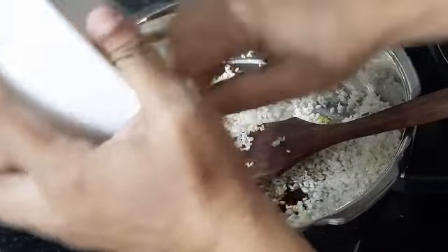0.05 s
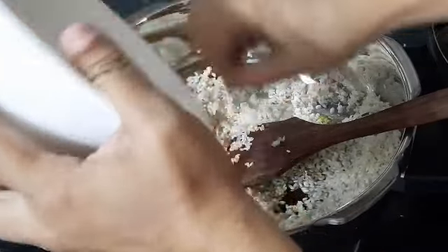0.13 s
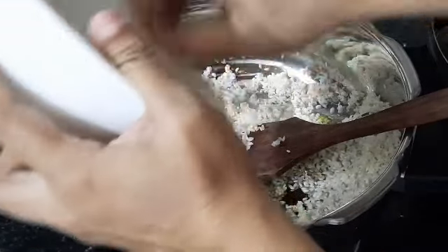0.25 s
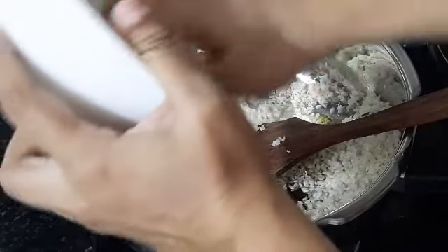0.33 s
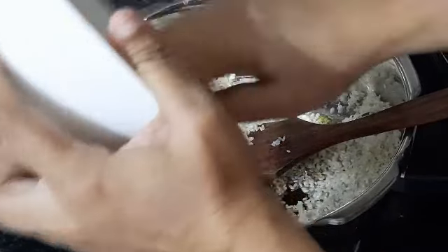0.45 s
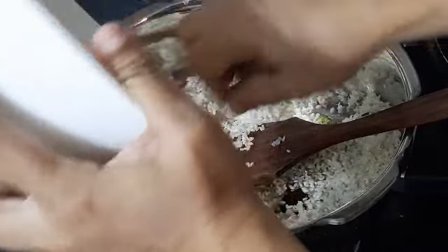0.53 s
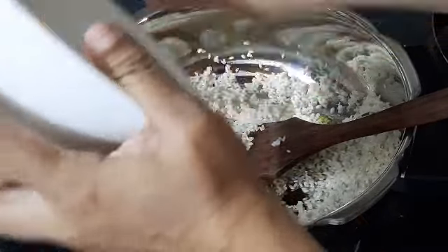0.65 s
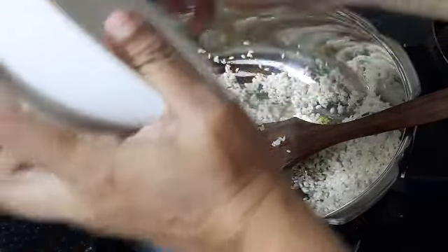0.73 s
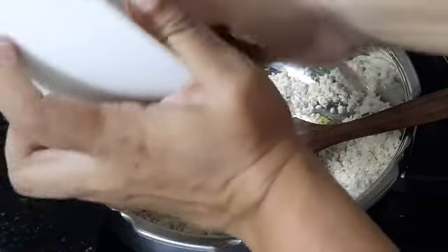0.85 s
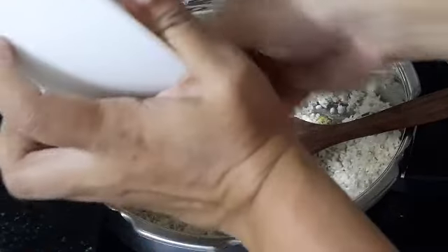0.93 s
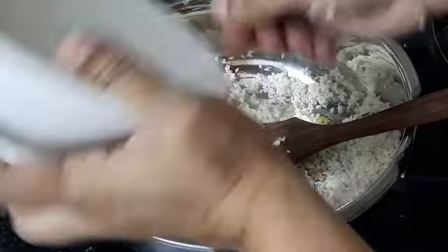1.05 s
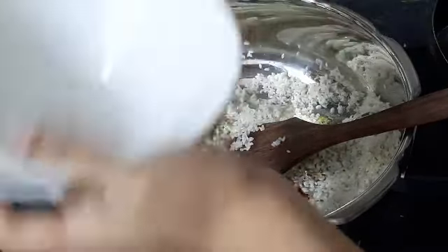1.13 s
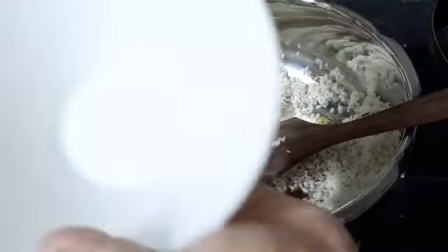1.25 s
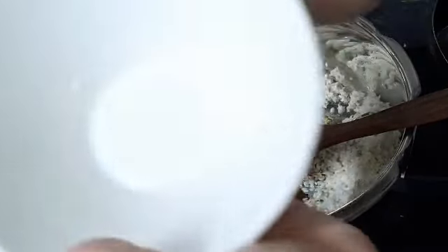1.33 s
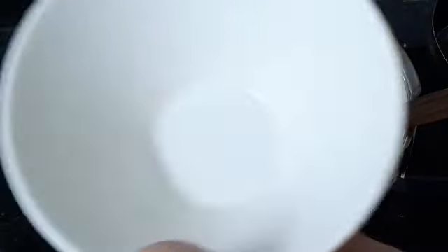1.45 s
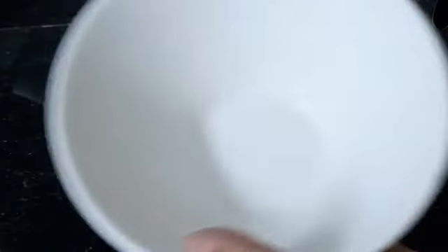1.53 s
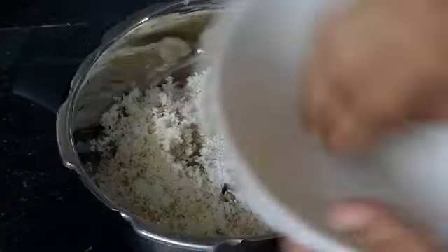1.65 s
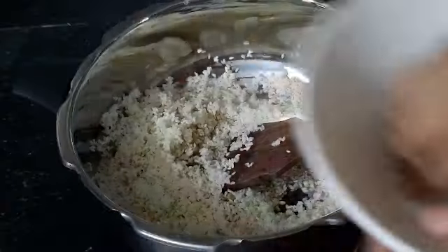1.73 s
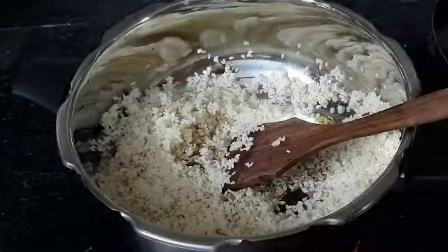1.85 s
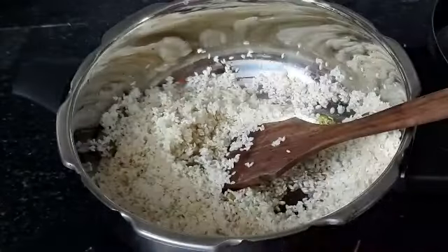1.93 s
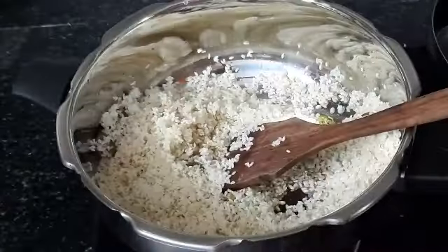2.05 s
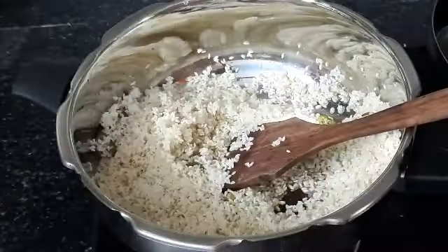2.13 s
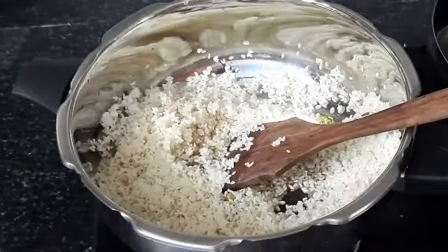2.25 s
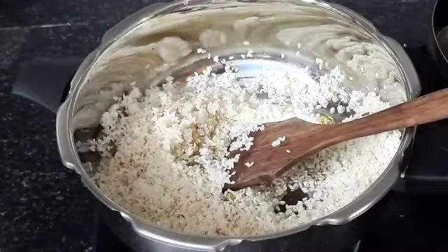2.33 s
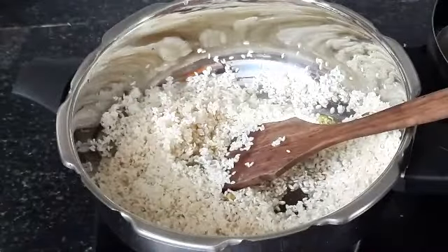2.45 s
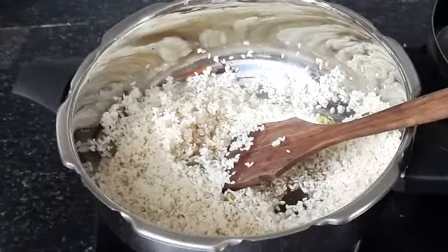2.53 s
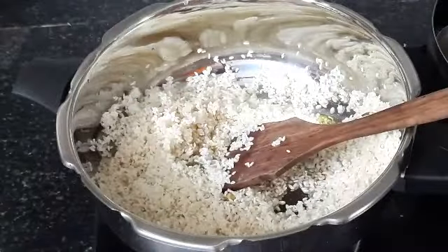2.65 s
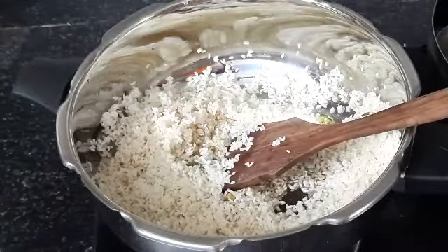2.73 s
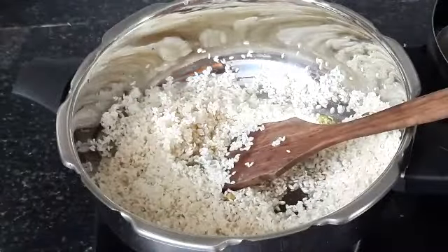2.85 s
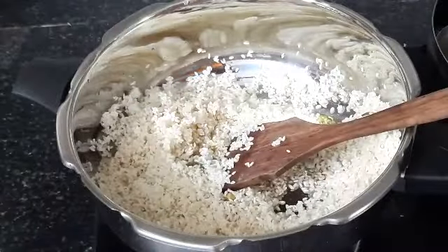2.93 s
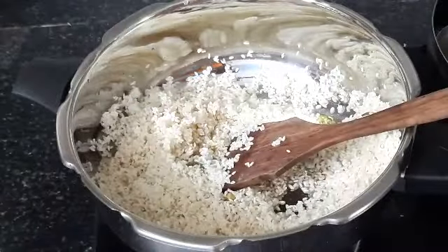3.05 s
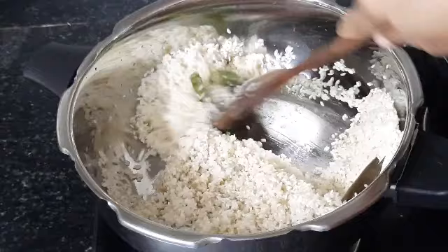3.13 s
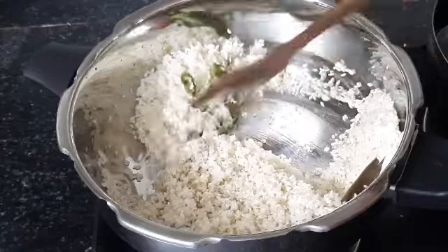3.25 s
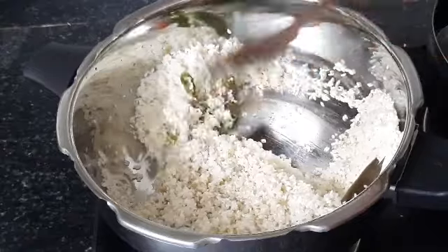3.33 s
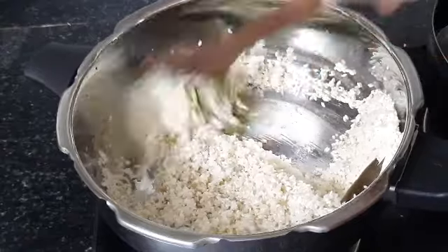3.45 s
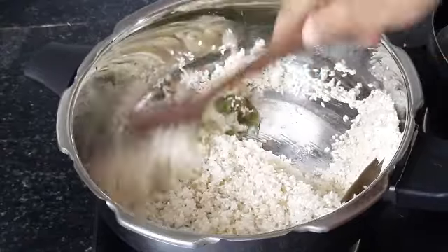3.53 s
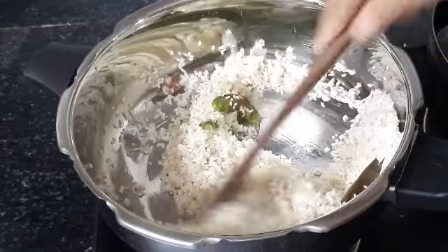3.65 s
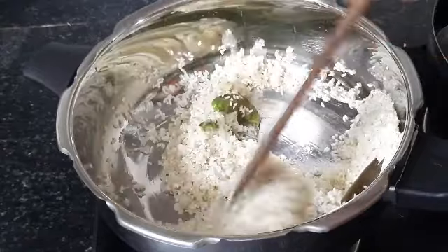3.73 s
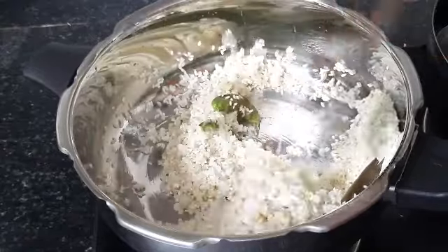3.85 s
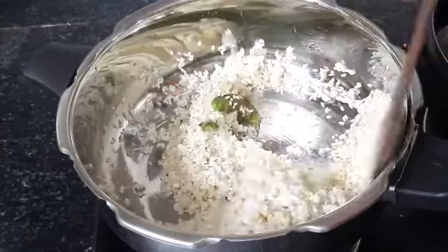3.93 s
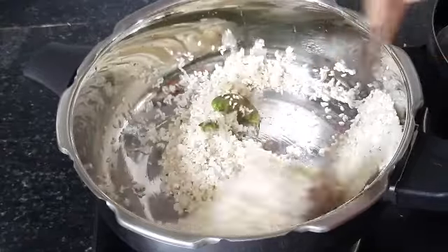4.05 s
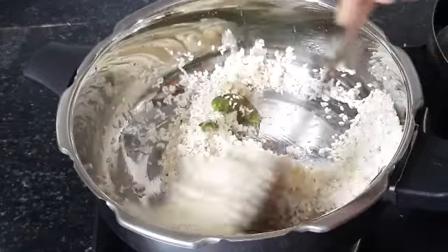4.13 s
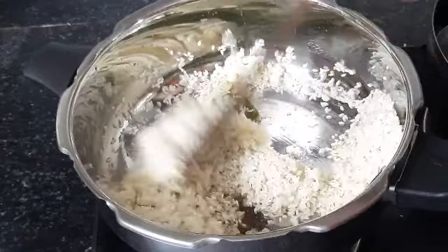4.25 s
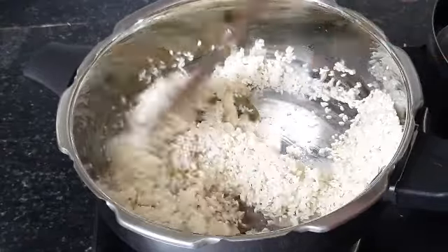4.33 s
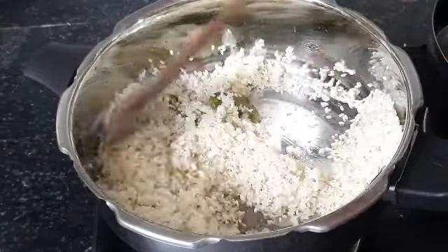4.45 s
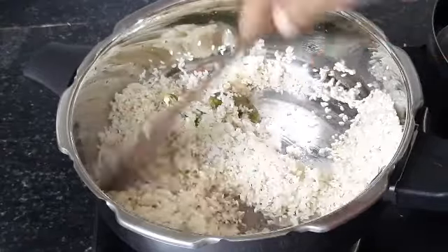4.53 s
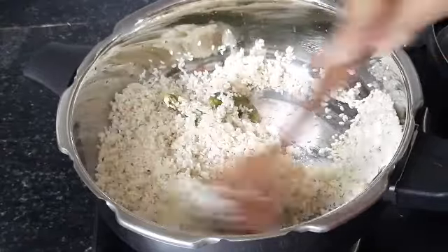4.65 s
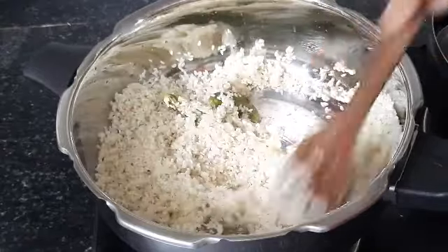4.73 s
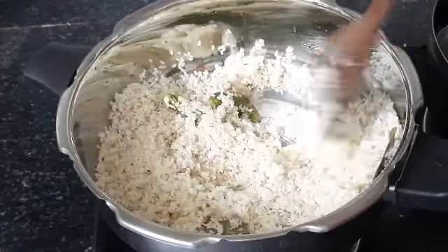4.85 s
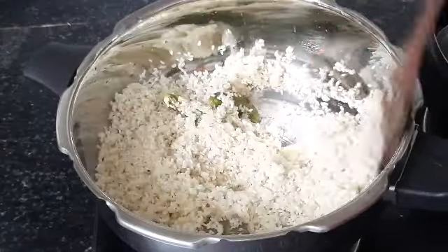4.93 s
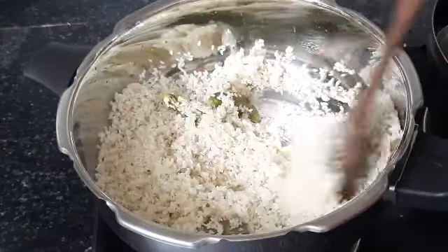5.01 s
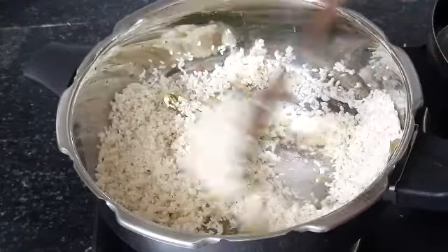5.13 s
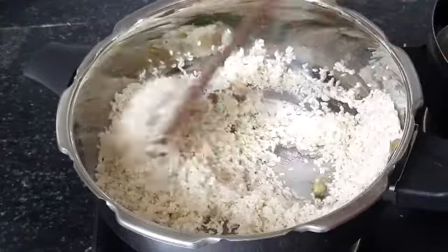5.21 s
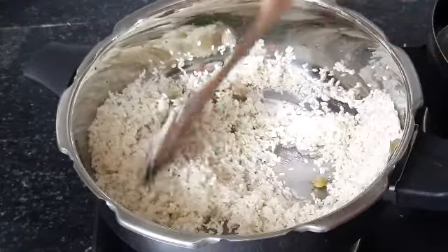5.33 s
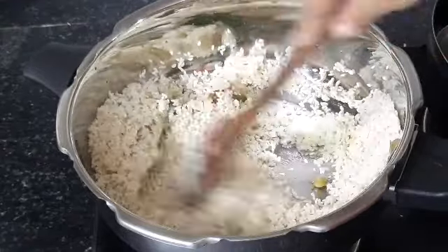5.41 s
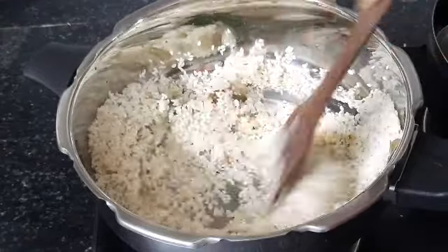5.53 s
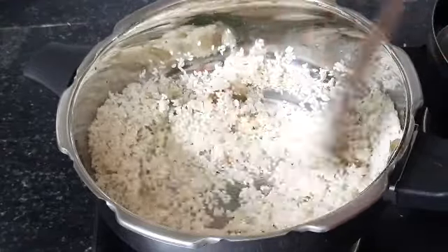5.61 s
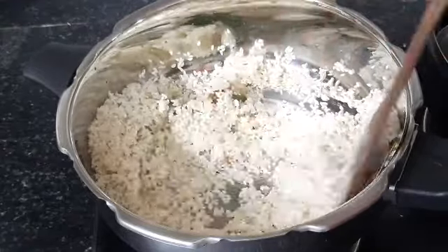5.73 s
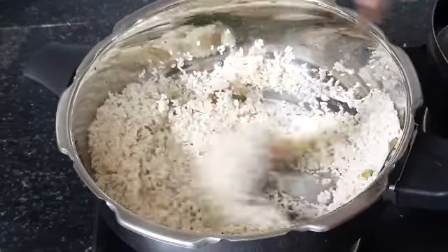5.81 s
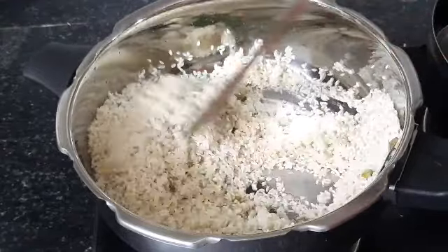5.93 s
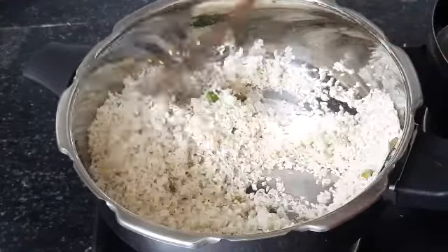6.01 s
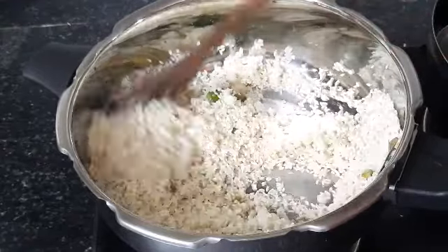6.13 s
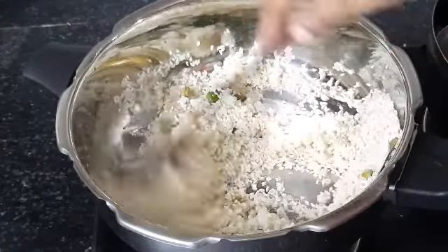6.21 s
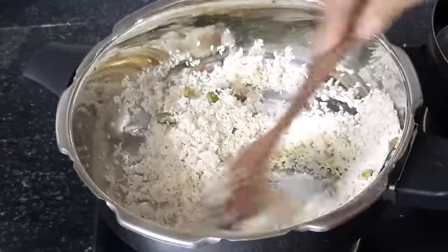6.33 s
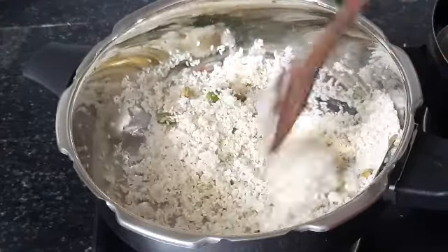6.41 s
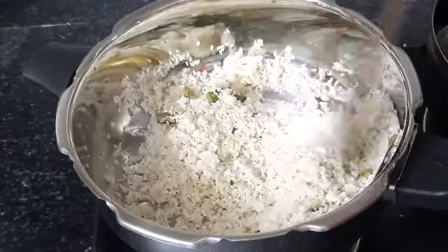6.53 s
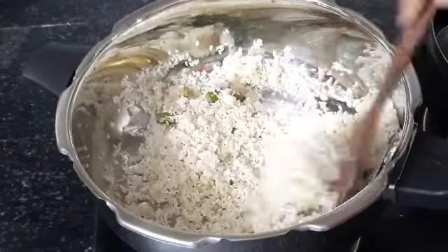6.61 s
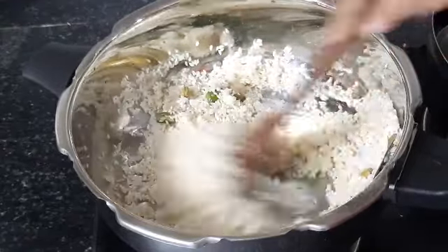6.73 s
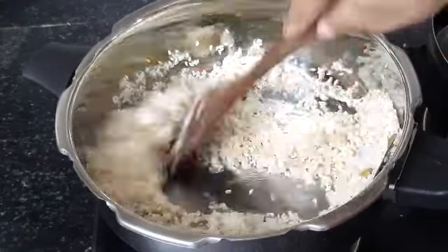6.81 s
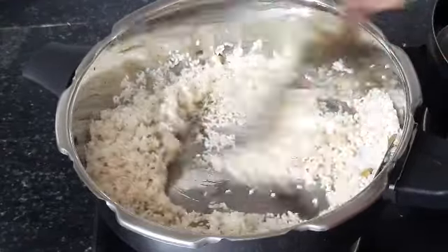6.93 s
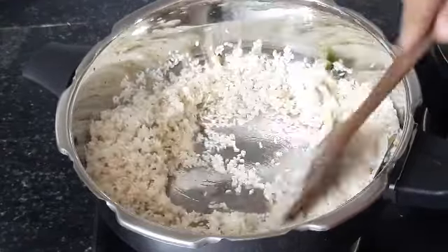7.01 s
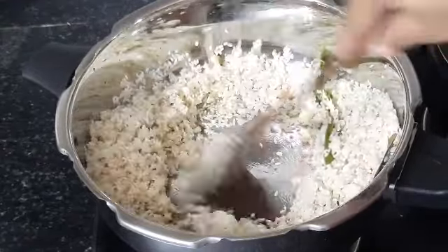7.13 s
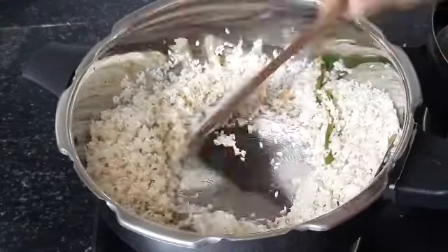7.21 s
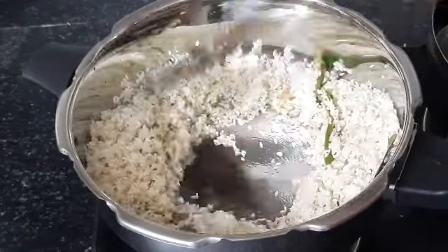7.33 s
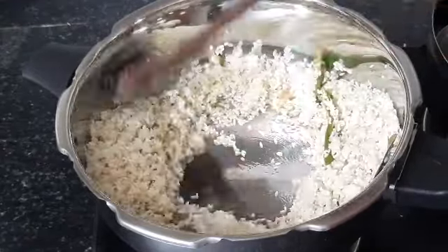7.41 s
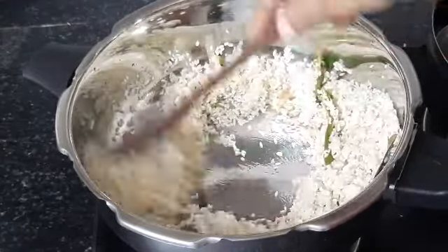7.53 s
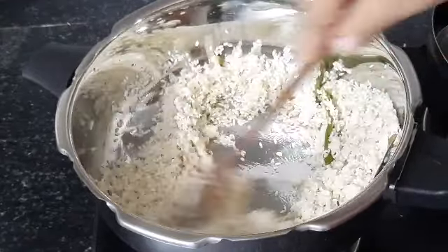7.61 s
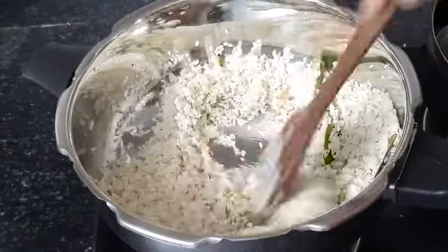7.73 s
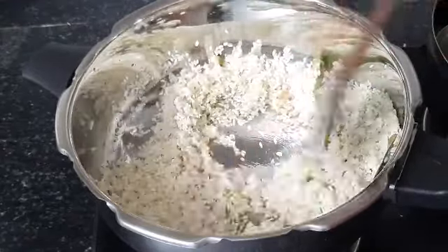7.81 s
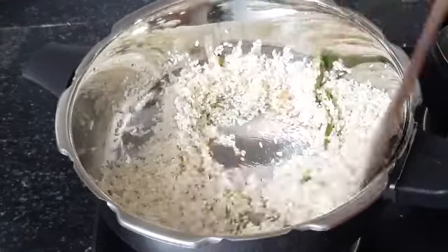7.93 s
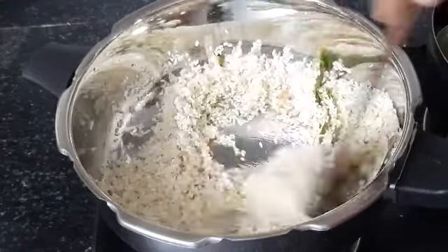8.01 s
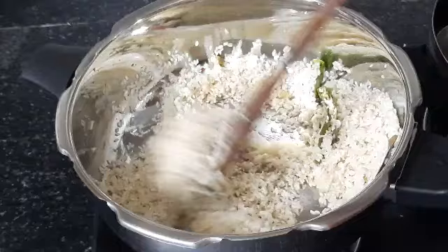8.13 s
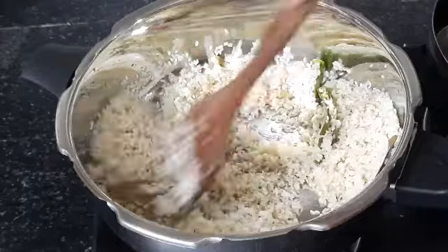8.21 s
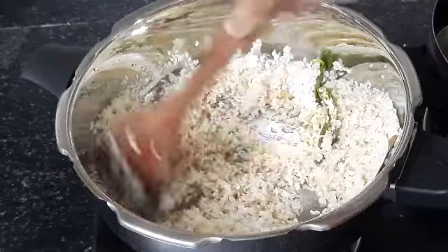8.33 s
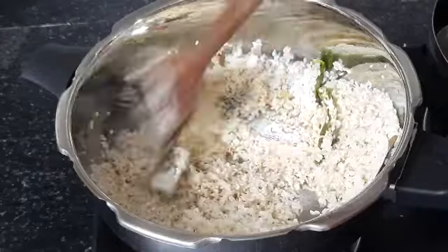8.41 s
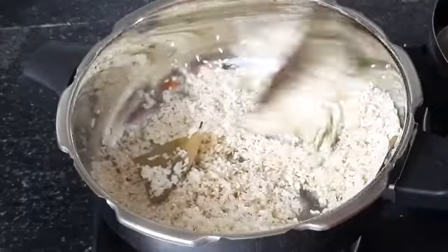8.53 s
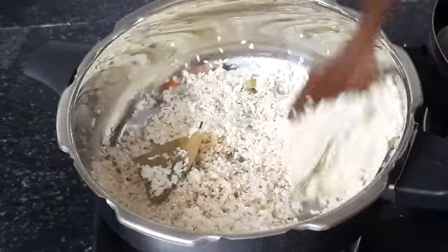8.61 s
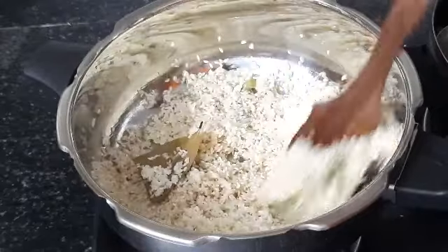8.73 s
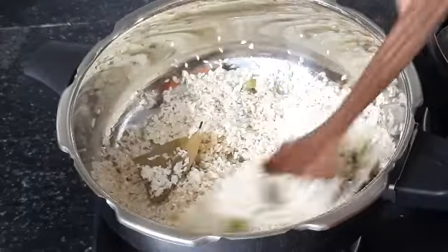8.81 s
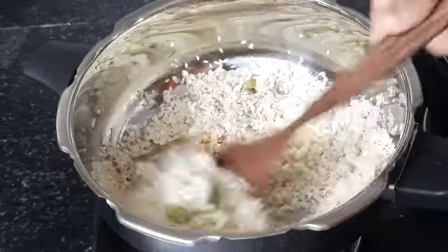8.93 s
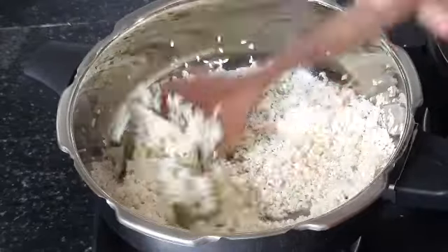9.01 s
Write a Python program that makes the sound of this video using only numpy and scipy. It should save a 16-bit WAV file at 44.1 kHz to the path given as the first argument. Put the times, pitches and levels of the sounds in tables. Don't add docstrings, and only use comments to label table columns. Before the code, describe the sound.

A close stereo phone microphone beside a steel pot in a kitchen. From 0 to 3.1 seconds, raw rice lies in hot fat: a steady, dense, bright sizzle with fine crackle, a faint rattle of the pot wall, occasional dry grain snaps, and a low fluttering burner rumble that weakens. Around 1.7 seconds a passing bowl slightly dulls the sizzle and leans it left. At about 3.15 seconds the sound dips almost to silence for an instant. Then a wooden spatula stirs until about 9 seconds: uneven hissing swells several times a second, quieter between strokes, with scraping grains, small snaps and sharp fat spits, the loudest near 6.6. Wood knocks the wall, giving dull thuds with short, damped metallic rings, strongest near 3.7, 4.1, 5.1, 5.85, 6.7, 7.1 and 8.1 seconds; light rim ticks and scuffs fall between. The flame is very faint by the end.

```python
import sys
import numpy as np
from scipy import signal
from scipy.fft import rfft, irfft, next_fast_len
from scipy.io import wavfile
from scipy.ndimage import uniform_filter1d

SR = 44100
rng = np.random.default_rng(int(sys.argv[2]) if len(sys.argv) > 2 else 0)


def transcribe(u):
    v = np.clip(np.atleast_2d(u).T, -1, 1)
    q = np.round(v * 32767).astype(np.int16)
    wavfile.write(sys.argv[1], SR, q)


def convert_level_to_amplitude(level_db):
    exponent = np.asarray(level_db, float) / 20
    return 10 ** exponent


N = 399987
FAST = next_fast_len(N, real=True)
TIME = np.arange(N) / SR
CALM = TIME < 3.175
BIN_HZ = np.linspace(0, SR / 2, FAST // 2 + 1)


def over_time(table, column):
    rows = np.array(table)
    return np.interp(TIME, rows[:, 0], rows[:, column])


def unit(x):
    return x / np.sqrt(np.mean(x ** 2))


def shape(points, hz):
    point_hz, value = np.transpose(points)
    return np.interp(np.log(hz + 1), np.log(point_hz), value)


def colour(x, points):
    cepstrum = irfft(np.log(convert_level_to_amplitude(shape(points, np.linspace(0, SR / 2, 2049)))))
    cepstrum[1:2048] *= 2
    cepstrum[2049:] = 0
    impulse = irfft(np.exp(rfft(cepstrum)))[None, :2048]
    return signal.oaconvolve(x, impulse, axes=1)[:, :N]


def calm_or_stir(x, calm_points, stir_points):
    return np.where(CALM, unit(colour(x, calm_points)), unit(colour(x, stir_points)))


# pitch_hz, correlation [0 to 1]
LIKENESS = [(25, .6), (60, 0.8), (130, .55), (300, 0.85), (1000, 0.4), (3000, 0.26), (7000, 0.17),
            (15000, 0.08)]


def ports(pair):
    like = np.clip(shape(LIKENESS, BIN_HZ), 0, 1)
    left, other = rfft(pair, FAST)
    right = like * left + np.sqrt(1 - like ** 2) * other
    return irfft(np.array([left, right]), FAST)[:, :N]


def walk(rate_hz):
    hold = int(SR / rate_hz)
    steps = np.repeat(rng.standard_normal(N // hold + 1), hold)
    return 1.1 * uniform_filter1d(uniform_filter1d(steps, hold), hold)[:N]


def band(x, lo_hz, hi_hz):
    return signal.sosfilt(signal.butter(3, [lo_hz, hi_hz], "band", fs=SR, output="sos"), x)


def split(x, centres_hz):
    spectrum = rfft(x, FAST)
    log_hz = np.log(np.linspace(1, SR / 2, FAST // 2 + 1))
    place = np.interp(log_hz, np.log(centres_hz), np.arange(len(centres_hz)))
    weights = [np.clip(1 - np.abs(place - k), 0, 1) for k in range(len(centres_hz))]
    return [irfft(spectrum * weight, FAST)[:, :N] for weight in weights]


def bumps(rows):
    step = TIME[::64]
    power = 0
    for s, db, rise, fall in rows:
        slopes = np.maximum((s - step) / max(rise, .005), (step - s) / max(fall, .005))
        power = power + convert_level_to_amplitude(2 * (db - 10 * slopes))
    return np.interp(TIME, step, 10 * np.log10(power + 1e-12))


def mixed(a_db, b_db):
    return 10 * np.log10(convert_level_to_amplitude(2 * a_db) + convert_level_to_amplitude(2 * b_db))


def pauses(rows):
    return sum(np.exp(-((TIME - s) / half) ** 4) for s, half in rows)


def crackle(per_s, spread_db, smear_s):
    when, size, fizz = rng.random((1, N)), rng.exponential(size=(1, N)), rng.standard_normal((2, N))
    clicks = (when < per_s / SR) * convert_level_to_amplitude(spread_db * np.minimum(size, 5))
    tails = signal.lfilter([1], [1, -np.exp(-1 / (smear_s * SR))], clicks)
    return unit(fizz * tails)


# start_s, level_db, left_minus_right_db
FRY = [
    (0.0, -43.5, 0.5),
    (.25, -42.5, 1),
    (.55, -43, 1),
    (1.2, -43, 1),
    (1.48, -43.5, 0.5),
    (1.74, -46, 4),
    (1.82, -44.5, 5.5),
    (2.0, -43, 2.5),
    (3.14, -43.5, 2.5),
]
# crest start_s, level_db, rise_s, fall_s [per 10 dB]
STROKES = [(3.2, -45.5, 0.3, 0.1), (3.62, -48, 0.18, .2), (3.71, -48, .1, 0.15), (4.04, -53.5, .04, -0.1),
           (4.16, -50, 0.17, 0.3), (4.31, -52.5, 0, 0.27), (4.49, -47.5, .12, 0.18),
           (4.64, -53, -0.04, 0.23), (4.92, -51, -0.03, 0.6), (5.03, -52.5, -0.07, 0.3),
           (5.17, -47.5, 0, 0.25), (5.37, -48, 0.1, .05), (5.64, -46, 0.15, 0.26), (5.89, -46.5, .15, .3),
           (6.05, -53, 0.2, 0.2), (6.16, -55, -0.24, 0.3), (6.36, -50, 0, 0.6), (6.49, -47.5, 0.06, .2),
           (6.63, -47, 0.08, 0.23), (6.76, -45.5, 0.01, .4), (7.1, -48, 0.12, 0.18),
           (7.27, -47.5, 0.25, 0.13), (7.65, -48.5, 0.08, 0.2), (7.76, -48, .08, 0.3),
           (7.94, -51, -0.26, 0.18), (8.128, -47, -0.12, 0.08), (8.3, -47, .1, .07), (8.62, -50, .08, 0.1),
           (8.88, -50, 0.15, .05), (9.06, -49, 0.32, -0.5), (5.11, -51, -0.22, .06),
           (6.69, -54, -0.43, 0.46), (6.9, -47, -0.14, -0.07), (7.57, -54, .04, 0.3),
           (7.86, -53, -0.2, 0.3), (8.55, -54.5, 0.3, -0.04), (8.76, -54, 0.3, -0.3), (3.39, -58, 0.3, 0.4),
           (7.46, -54, .03, -0.4)]
REST_DB = -61


def heat():
    return np.where(CALM, over_time(FRY, 1), mixed(bumps(STROKES), REST_DB))


COARSE_DB = [0.5, 1, 3, 5, 1, -1, 1.5, 1.5, 0.5, 3, 0, -0.5, 0.5, -1, 0.5, 3, 1, -1.5, -1.5, 1.5, 4, -1, -1,
             -0.5, -4, 1.5, -3.5, -2, -0.5, 1.5, 0.5, 6, -3.5, -0.5, -3, 2, -4, 2.5, 0]


def coarse():
    rows = [(s, db + more, rise, fall) for (s, db, rise, fall), more in zip(STROKES, COARSE_DB)]
    return np.where(CALM, 0, mixed(bumps(rows), REST_DB) - mixed(bumps(STROKES), REST_DB))


# pitch_hz, level_db [per Hz]
CALM_COLOUR = [(820, -27.5), (1400, -11), (1550, -7), (1770, 1.5), (1940, -5.5), (2530, -4), (3960, 0.5),
               (6590, 0.5), (9320, -2), (11900, 2), (14000, 0), (15200, -4), (15900, -12), (16500, -38)]
# pitch_hz, level_db [per Hz]
STIR_COLOUR = [(820, -30), (1400, -23), (1650, -7), (2350, -6.5), (2550, -4.5), (2860, -5), (4470, -3),
               (5540, -3), (7080, -0.5), (9420, -3.5), (12400, 1.5), (14700, -2), (15900, -9), (16500, -43)]
COARSE_HZ = [3000, 6700]


def sizzle(frying, rasp):
    pop_share = np.where(CALM, .12, .21)
    fizz = crackle(per_s=19000, spread_db=-3.0, smear_s=0.00054)
    pops = unit(np.diff(crackle(per_s=130, spread_db=3.0, smear_s=.0004), prepend=0))
    bubbles = ports(np.sqrt(1 - pop_share ** 2) * fizz + pop_share * pops)
    bright = band(calm_or_stir(bubbles, CALM_COLOUR, STIR_COLOUR), 1230, 20000)
    swell_db = walk(14) * np.where(CALM, .55, .6)
    centres_hz = 1700 * 2 ** np.arange(0, 3.1, .5)
    sound = 0
    for centre, part in zip(centres_hz, split(bright, centres_hz)):
        rasp_db = rasp * np.interp(centre, COARSE_HZ, [1, 0])
        sound = sound + part * convert_level_to_amplitude(swell_db + .8 * walk(10) + rasp_db)
    pan_db = np.where(CALM, over_time(FRY, 2), 2.5 - 0.1 * walk(8.1))
    return sound * convert_level_to_amplitude(frying + 4.5 + np.array([pan_db, -pan_db]) / 2)


# start_s, level_db [peak], left_minus_right_db
SPITS = [(3.182, -32, 1), (3.3076, -33, 3), (3.394, -37, 8), (3.534, -38, 9), (3.561, -34.5, 12),
         (3.8, -35, 4), (3.9968, -46, 2.0), (4.131, -35, -7), (4.1604, -37, 6), (4.481, -29, 2),
         (4.609, -39, 3), (4.6342, -30, -2), (4.6855, -50, -1), (5.1168, -32, 1), (5.236, -28.5, 0),
         (5.4698, -41.5, -4), (5.752, -34, -2), (5.584, -33, -2), (5.617, -33.5, 1), (5.8107, -31.5, 8.5),
         (6.0067, -41, -1), (6.035, -35.5, 2), (6.0876, -41.5, -0.5), (6.156, -33, 1), (6.47, -31, -1),
         (6.603, -35, -2), (6.622, -22.5, 2), (7.459, -36, -1), (7.5594, -48, 0), (7.931, -32, 0),
         (7.9954, -48, -3), (8.4029, -46, 1.5), (4.446, -31, 3), (5.4935, -46, 8), (8.115, -32, 2.0),
         (9.0349, -40, 1.0)]


def spits():
    out, t = np.zeros((2, N + 2100)), np.arange(2000) / SR
    for (s, db, pan), hiss in zip(SPITS, rng.standard_normal((len(SPITS), 2, 2000))):
        burst = hiss * (.6 * np.exp(-t / .0007) + .2 * np.exp(-t / .006))
        start = int(s * SR) + 30
        out[:, start:start + 2000] += burst * convert_level_to_amplitude(db - 3.5 + np.array([[pan], [-pan]]) / 2)
    out = out[:, :N]
    return band(out, 2000, 5000) * convert_level_to_amplitude(2.5) + band(out, 5000, 15000) * convert_level_to_amplitude(7.5)


# start_s, level_db [peak], left_minus_right_db
SNAPS = [(1.1883, -27, 0), (1.3874, -26, 0), (1.8051, -27, 11), (2.6268, -28, 0), (2.7002, -28, 1),
         (2.8545, -27, 10), (2.9645, -27, 2), (3.0235, -27, 3), (3.1415, -28, 5), (3.2575, -33, 11),
         (3.4156, -37, 5), (3.4481, -37, 3), (3.5762, -33, 6), (3.7652, -34, 3), (4.3064, -31, 1),
         (4.396, -35, 7), (4.477, -29, 4), (4.6858, -37, 3), (5.0749, -35, 7), (5.1737, -29, 10),
         (5.293, -29, 3), (5.3357, -32, 6), (5.364, -31, 2), (5.471, -33, 2), (5.4948, -36, 4),
         (5.5225, -36, 3), (5.5852, -30, 2), (5.6226, -29, 2), (5.7438, -31, 4), (5.7529, -29, 4),
         (5.7737, -30, 7), (5.781, -32, 3), (5.8294, -31, 2), (5.903, -28, 2), (5.9127, -28, -1),
         (6.0081, -33, 3), (6.0377, -29, 3), (6.0889, -31, 5), (6.6912, -32, 6), (7.1545, -31, 0),
         (7.2389, -31, 2), (7.3292, -33, 4), (7.3723, -37, 3), (7.3843, -37, -2), (7.5611, -35, -1),
         (7.7994, -30, 5), (7.8384, -32, 1), (7.9645, -34, 0), (7.9968, -35, 0), (8.1672, -33, -1),
         (8.4047, -38, -3), (8.4399, -38, 4), (8.4781, -34, 9), (8.6476, -31, 5), (8.7924, -36, -6),
         (9.0367, -32, -2)]


def snaps():
    out, t = np.zeros((2, N + 200)), np.arange(100) / SR
    for (s, db, pan), hiss in zip(SNAPS, rng.standard_normal((len(SNAPS), 2, 100))):
        click = (hiss + hiss[0]) * np.exp(-t / .0003)
        click = click / np.abs(click).max(axis=1)[:, None]
        start = int(s * SR) - 6
        out[:, start:start + 100] += click * convert_level_to_amplitude(db - 1 + np.array([[pan], [-pan]]) / 2)
    return band(out[:, :N], 2500, 15500)


def shaking(zone, frying):
    drag_db, lead_db = [-16.5, -16, -24.5][zone], [-22, -20, -24][zone]
    drag = bumps([(s + 0.018, db + drag_db, .009, 0.091) for s, db, *_ in KNOCKS])
    lead = bumps([(s + 0.0025, db + lead_db, .016, .006) for s, db, *_ in KNOCKS])
    scrape = [-73, -71, -67][zone] + [0.7, 1, 0.95][zone] * (frying + 50)
    stir = mixed(scrape, mixed(drag, lead))
    settle = [-59, -58, -57][zone] + [-3.5, -0.5, 0.25][zone] * TIME
    lull = pauses([(2.14, 0.018), (2.29, 0.016), (2.77, 0.054), (3.0, 0.05), (3.139, 0.0096)])
    hush = pauses([(.21, 0.014), (1.43, 0.018)])
    return np.where(CALM, settle + [-28, -2, 1.5][zone] * lull - 5 * hush, stir)


# pitch_hz, level_db [per Hz]
RATTLE_COLOUR = [(110, -52), (180, -7), (221, -35.5), (320, -4.5), (424, -13.5), (606, -4), (654, -7.5),
                 (761, -2), (866, -9.5), (1080, -4.5), (1190, 0), (1490, -8), (1770, -15.5), (1950, -10),
                 (2400, -4), (3120, -19), (5280, -120)]
# pitch_hz, level_db [per Hz]
SCRAPE_COLOUR = [(110, -41), (235, -19), (349, -8), (526, -12), (619, -0.5), (675, -5), (753, -1.5),
                 (976, -10.5), (1230, -4.5), (2400, -17.5), (3120, -35), (5280, -120)]


def rattle(frying):
    grains = ports(crackle(per_s=2500, spread_db=1.0, smear_s=0.0033))
    grains = calm_or_stir(grains, RATTLE_COLOUR, SCRAPE_COLOUR)
    edges_hz = 177 * 2 ** np.arange(0, 3.8, .25)
    swell, unrest_db, out = walk(11), np.where(CALM, .4, 1.2), 0
    for zone in range(3):
        pairs = [(lo, hi) for lo, hi in zip(edges_hz, edges_hz[1:]) if np.searchsorted([510, 1010], hi) == zone]
        parts = [band(grains, lo, hi) for lo, hi in pairs]
        whole = sum(parts)
        scale = np.where(CALM, np.std(whole[:, CALM]), np.std(whole[:, ~CALM]))
        depth = min(1200 / edges_hz[zone * 4 + 6], 3.5)
        flicker = sum(part * convert_level_to_amplitude(unrest_db * (0.81 * swell + depth * walk(9.2))) for part in parts)
        out = out + flicker / scale * convert_level_to_amplitude(shaking(zone, frying) + np.where(CALM, .3, 1.5))
    return out * convert_level_to_amplitude([[1.2], [-1.2]])


# start_s, force_db, base_share_db, wall_share_db, height_db [how high on the wall]
KNOCKS = [(3.193, -47.5, -4, -10, 4), (3.484, -43, -32, -8, 2), (3.5018, -56, -6, -1.5, -8),
          (3.638, -54.5, -3, -5, -11), (3.699, -38, -11.5, -16.5, 1), (3.719, -64, -8, -18, -1),
          (4.13, -35, -1, -20.5, 1.5), (4.571, -42.5, -14, -5, -9), (4.595, -58, -17, -1.5, -5.5),
          (4.641, -71, -6, 2, -10.5), (5.0325, -55.5, -2, 3, 1), (5.137, -31, -5, -2.5, 2.5),
          (5.8554, -33, -1.2, -9.5, 2), (6.156, -40.5, -17, -10.5, 1.5), (6.1965, -50, -9, 1.5, -3.5),
          (6.7258, -31.5, -2.5, -2, 6), (6.966, -68, -3, 13, 4.5), (7.1021, -39, -10.5, 0, 6.5),
          (7.5124, -41.5, -15, -3.5, -3.5), (8.093, -33, -2.5, -9, 1.5), (8.4424, -56, -6.5, -11, -1),
          (8.5183, -44, -13, -24, -1), (8.5717, -43.5, -25, -17.5, 0.5), (8.5994, -46.5, -29, -18, -3),
          (8.638, -70, -11, -12, -2)]
RIM_TRIM_DB = [-11, 3, 3, -2, 7, -5, 6, -0.5, 10, -2, -6.5, 0.5, -7, 0.5, -9, -3, -2, -8, -2, -8, 3, 15.5,
               10, 10, 0]
# start_s, level_db
TICKS = [(3.346, -54), (3.3914, -54), (4.4795, -52), (4.899, -54), (5.0325, -42), (5.6177, -47),
         (5.813, -65), (6.38, -51), (6.472, -56), (6.525, -52), (6.85, -50), (7.73, -51.5)]
TICK_REACH_DB = [-53, -16, -28, -19, 3.5]
# start_s, level_db
SCUFFS = [(3.2548, -67), (5.6, -65), (6.983, -59), (7.266, -56.5), (7.32, -61.5), (8.739, -58.5),
          (8.846, -56.5), (1.766, -74), (1.801, -69), (2.213, -68), (2.971, -65), (1.94, -59), (2.04, -55)]
SCUFF_REACH_DB = [-1.5, 3, -13, -5, -14]
# start_s, force_db,
# base_share_db, wall_share_db
MORE_KNOCKS = [
    (3.511, -56, -14, -7),
    (4.183, -51, -12, -18),
    (6.214, -49, -5, -5),
    (7.134, -50, -10, 2),
    (8.632, -53, -17, -19),
    (6.545, -74, -10, -9),
]


def blows():
    touches = []
    for (s, db, base, wall, up), trim in zip(KNOCKS, RIM_TRIM_DB):
        rim = wall + 2.5 + 0.24 * up + trim
        touches.append((s, up, db + np.array([base, 0, wall - up, wall + up, rim])))
    touches += [(s, 0, db + np.array(TICK_REACH_DB)) for s, db in TICKS]
    touches += [(s, 0, db + np.array(SCUFF_REACH_DB)) for s, db in SCUFFS]
    touches += [(s, 0, db + np.array([base, 0, wall, wall, wall - 4])) for s, db, base, wall in MORE_KNOCKS]
    return touches


ZONES_HZ = [300, 500, 980, 1150, 1450, 2500]
THUD_TAIL = [.33, .33, .15, .15, .08]


def thud(noise, zone_db, t):
    levels_db = zone_db + [3.2, 0.5, 8.4, 8.2, 13.0]
    sound = 0
    for lo, hi, db, tail in zip(ZONES_HZ, ZONES_HZ[1:], levels_db, THUD_TAIL):
        fade = np.exp(-t / 0.0051) + tail * np.exp(-t / 0.073)
        wall_db = -3.5 * (lo > ZONES_HZ[1])
        sound = sound + unit(band(noise, lo, hi)) * convert_level_to_amplitude(db + wall_db) * fade
    sound[1] = 0.26 * sound[0] + sound[1]
    return sound


# pitch_hz, level_db, fade_60db_s
POT = [(318, 5, .3), (348, -4, .18), (431, 0, .28), (490, -8, .15), (565, -3, .25), (605, 0, .2),
       (705, -3, .22), (745, -2, .2), (870, -5, .25), (1092, -3, .24), (1114, 1.5, .36), (1210, 0, .5),
       (1335, -17, .2), (1406, -15, .22), (1593, -2, .22), (1712, -8, .18), (1920, -4, .22),
       (2190, -2.5, .13), (2318, -6, .28)]


def knocks():
    out, t = np.zeros((2, N + 16000)), np.arange(16000) / SR
    hz, db, t60 = np.transpose(POT)[:, :, None]
    zone = np.searchsorted(ZONES_HZ, hz[:, 0]) - 1
    loaded = np.clip(1.9 - hz / 550, .22, 1)
    spread_db = np.array([1.3, 2.9, .3, 0.56, 0.6])[zone, None]
    touches = blows()
    luck = rng.standard_normal((len(touches), 4, len(POT), 1))
    noises = rng.standard_normal((len(touches), 2, 16000))
    for (s, up, reached), (reach, detune, lean, turn), noise in zip(touches, luck, noises):
        zone_db = reached + [2.0, -1.5, 2.0, -2.5, -6.5]
        tilt_db = (hz > ZONES_HZ[4]) * np.clip(2.5 * up * (hz - 1920) / 1000, -9, 9)
        swing = np.clip(9 + (zone_db.max() + 24) / 20, .68, .95)
        fade = np.exp(-np.log(1000) * t / (t60 * swing))
        gain = convert_level_to_amplitude(zone_db[zone, None] + db + spread_db * reach + tilt_db) * fade
        steps = np.cumsum(rng.standard_normal((len(POT), 500)), axis=1)
        shake = steps.repeat(32, axis=1) * .18 * loaded
        jostle = rng.standard_normal((len(POT), 25)).repeat(640, axis=1)
        jostle = uniform_filter1d(jostle, size=640, axis=1)
        gain = gain * convert_level_to_amplitude(2.8 * jostle * np.minimum(t / .03, 1))
        phase = 2 * np.pi * hz * (1 + 0.0075 * loaded * detune) * t + shake + 1.3 * turn
        ring = []
        for side in (1, -1):
            wave = np.sin(np.float32(phase + side * lean * np.minimum(hz / 1500, .45)))
            ring.append((gain * convert_level_to_amplitude(side * 0.82 * lean) * wave).sum(0))
        ring = np.array(ring) * (1 + 1.21 * np.exp(-t / 0.009))
        blow = ring * convert_level_to_amplitude(-6.0) + thud(noise, zone_db, t) * convert_level_to_amplitude(-1.5)
        onset = 1 - np.exp(-(t / (.0034 * swing ** 2)) ** 2)
        start = int(s * SR)
        out[:, start:start + 16000] += blow * onset
    return band(out[:, :N], 348, 7900) * convert_level_to_amplitude([[1.5], [-1.5]])


# start_s, level_db
FLAME = [(0.0, -53), (0.2, -60), (0.4, -53.5), (0.85, -60.5), (1.3, -59), (1.44, -67), (1.55, -60),
         (1.8, -70), (2.2, -65), (3.05, -67.5), (3.86, -57), (4.02, -67.5), (5.0, -71), (6.6, -73.5),
         (7.07, -74), (7.43, -71.5), (8.0, -71.5), (9.07, -70.5)]
# pitch_hz, level_db [per Hz]
FLAME_COLOUR = [(12, -24), (20, -5), (32, -12), (50, -20), (66, 3.5), (82, 2), (100, -1.5), (131, -6),
                (182, -14.5), (217, -17), (260, -14), (340, -43), (570, -120)]
# pitch_hz, level_db [per Hz]
LOW_FLAME_COLOUR = [(12, -70), (20, -18), (70, 4.5), (113, 4), (162, 1.5), (210, 1), (260, -4.5),
                    (340, -11), (570, -120)]


def flame():
    noise = ports(rng.standard_normal((2, N)))
    high, low = unit(colour(noise, FLAME_COLOUR)), unit(colour(noise, LOW_FLAME_COLOUR))
    rumble = np.where(TIME < 4.0, high, low)
    jolts = bumps([(s + 0.029, db + base - 27.5, .015, 0.069) for s, db, base, *_ in KNOCKS])
    level_db = mixed(over_time(FLAME, 1), jolts) + 0.25 * walk(3.5)
    return rumble * convert_level_to_amplitude(level_db + np.array([[.2], [-.2]]))


def scene():
    frying, rasp = heat(), coarse()
    cooking = sizzle(frying, rasp) + spits() + snaps()
    return cooking + rattle(frying + rasp) + knocks() + flame()


# pitch_hz, level_db [under the mean treble, where muting starts]
MUTE = [(40, -17), (200, -9.5), (400, -15), (800, -9.5), (1100, -12.5), (1600, -8.5), (2500, -7.5)]


def mute(x):
    hz, _, spec = signal.stft(x, SR, nperseg=2048, noverlap=1536)
    power = uniform_filter1d(np.mean(np.abs(spec) ** 2, axis=0), size=3, axis=1) + 1e-18
    bands = power[:1024].reshape(256, 4, -1).mean(axis=1).repeat(4, axis=0)
    treble = power[150:700].mean(axis=0)
    margin_db = 10 * np.log10(bands / treble) - shape(MUTE, hz[:1024, None])
    spec[:, :1024] *= convert_level_to_amplitude(-22.0 / (1 + np.exp(np.clip(margin_db, -30, 30))))
    return signal.istft(spec, SR, nperseg=2048, noverlap=1536)[1][:, :N]


def low_pass(x):
    return signal.sosfilt(signal.butter(12, 15900, fs=SR, output="sos"), x)


# pitch_hz, left_minus_right_db
LEAN = [(60, -1), (130, 6), (300, -2.5), (600, 0), (1200, 2.5), (2500, 1.5), (4500, -1.7), (8000, 0),
        (13000, 0.5)]
CUT_S = (3.145, 3.155, 3.175, 3.181)


def record(dry):
    lean = convert_level_to_amplitude(shape(LEAN, BIN_HZ) * np.array([[.5], [-.5]])) + 0j
    lean[0] = lean[0] * np.exp(2j * np.pi * np.arange(FAST // 2 + 1) * 1.5 / FAST)
    heard = irfft(rfft(dry, FAST) * lean, FAST)[:, :N]
    join = np.interp(TIME, CUT_S, [0.99, 0.023, 0.096, 1.0])
    mix = mute(heard) * join
    return low_pass(mix)


dry = scene()
out = record(dry)
transcribe(out)
```